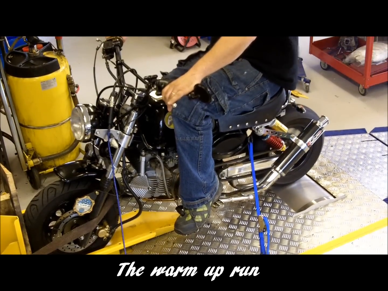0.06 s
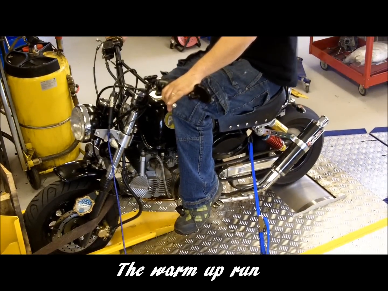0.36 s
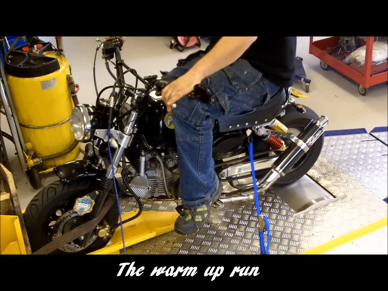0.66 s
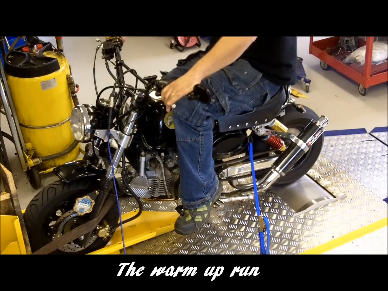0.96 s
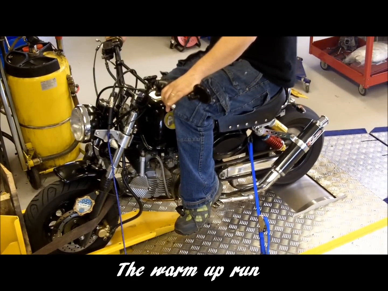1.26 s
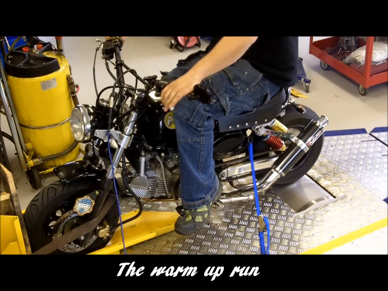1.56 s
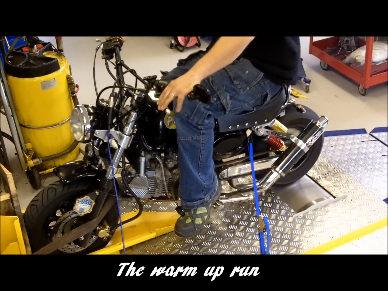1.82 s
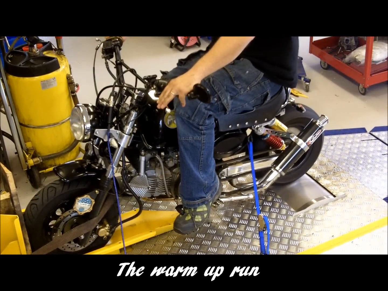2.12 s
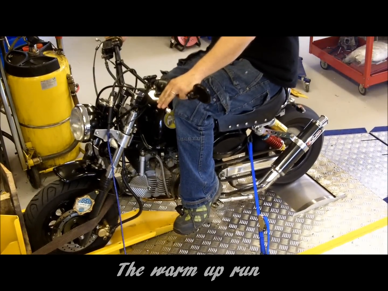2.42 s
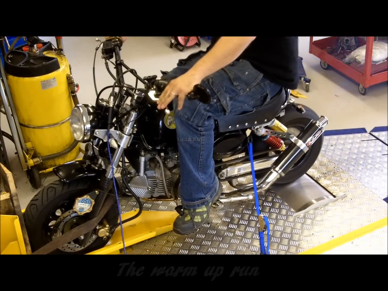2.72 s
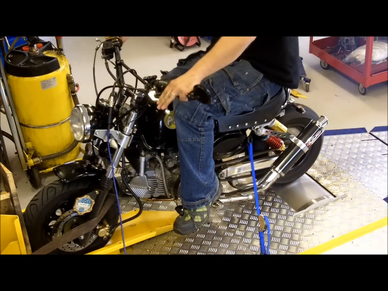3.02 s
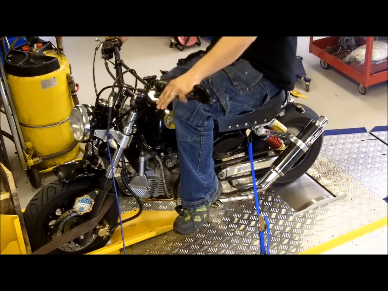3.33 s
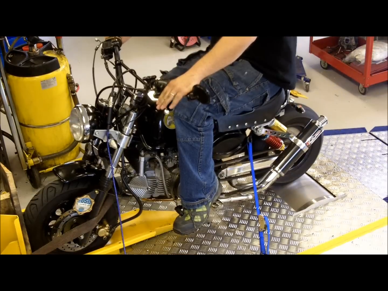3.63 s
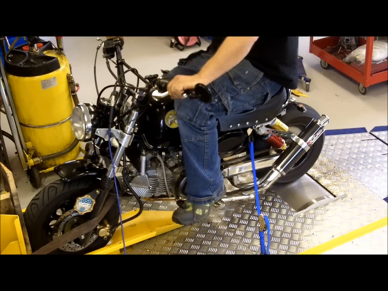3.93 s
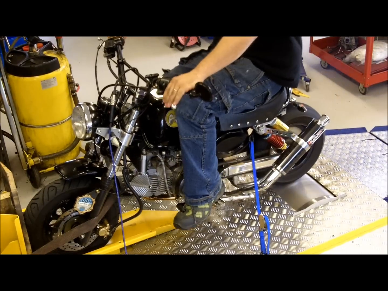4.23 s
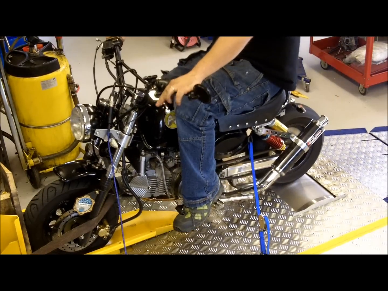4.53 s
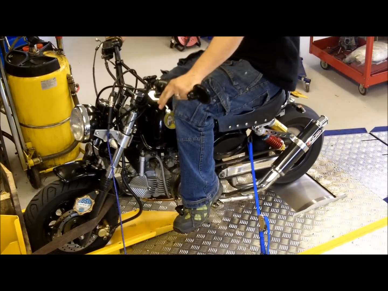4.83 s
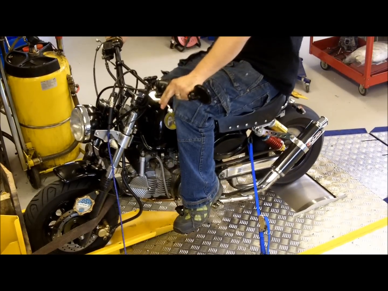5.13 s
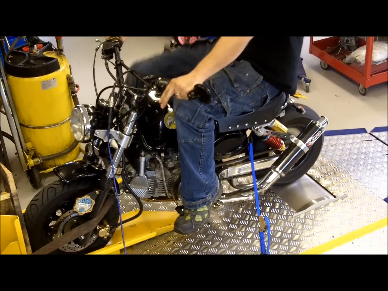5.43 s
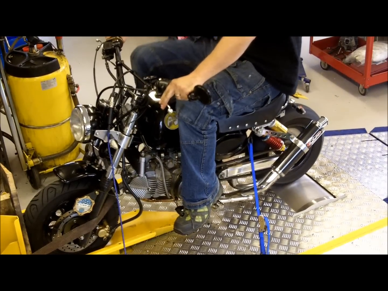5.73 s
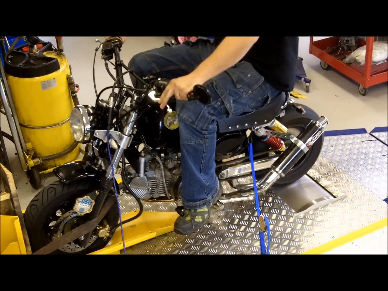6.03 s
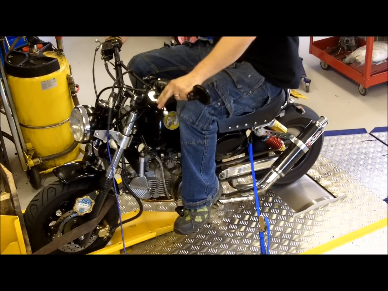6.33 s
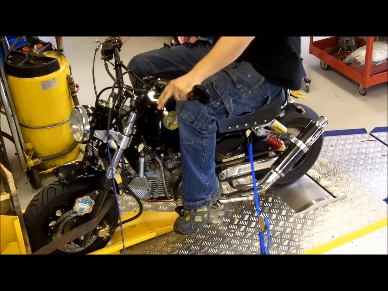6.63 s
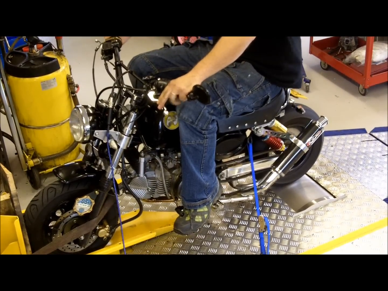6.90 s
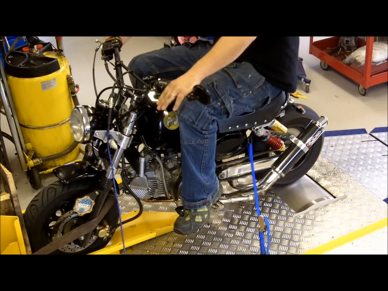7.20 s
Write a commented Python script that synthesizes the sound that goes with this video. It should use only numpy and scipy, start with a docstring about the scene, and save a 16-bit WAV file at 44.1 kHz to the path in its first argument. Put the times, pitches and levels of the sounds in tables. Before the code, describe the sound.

Close by in a slightly echoing workshop, a small motorcycle engine throbs at light throttle, then climbs in pitch with a hard, rasping exhaust. The throttle shuts briefly for a single gear change and the engine burbles down, before building speed again to the end. Metallic ticks and rattles from the engine and chain run through it, while the roller under the wheel rumbles faintly.

```python
"""In a workshop, a small single-cylinder four-stroke motorcycle pulls on a rolling road.
It runs steadily, accelerates, drops its revs for a gear change and pulls again.
Each firing sends a pulse out of the exhaust, whose harmonics sweep through the fixed resonances
of pipe and room. Escaping gas rasps, impacts of valve gear and chain ring
the engine cases, and the roller rumbles underneath."""
import sys
import numpy as np
from scipy import signal
from scipy.fft import irfft
from scipy.io import wavfile
from scipy.ndimage import uniform_filter1d

SR = 44100
rng = np.random.default_rng(int(sys.argv[2]) if len(sys.argv) > 2 else 0)


def digitize_waveform(pressure):
    """Quantize a signal to 16-bit integers and store it at the path in sys.argv[1].

    Rows of a 2-D input are taken as channels; values are limited to [-1, 1].
    """
    field = np.atleast_2d(pressure).T
    bounded = np.clip(field, -1, 1)
    quanta = np.round(bounded * 32767).astype(np.int16)
    wavfile.write(sys.argv[1], SR, quanta)


N = 320166
TIME = np.arange(N) / SR
FFT_SIZE = 32768
HZ = np.fft.rfftfreq(FFT_SIZE, 1 / SR)


def gain_of(db):
    """Amplitude ratio of a level in decibels."""
    return 10 ** (np.asarray(db) / 20)


def unit_rms(x):
    """Normalisation to an overall rms of 1."""
    return x / np.sqrt(np.mean(x ** 2) + 1e-20)


def steadied(x, size=6000):
    """Normalisation by the running rms over size samples."""
    return x / np.sqrt(abs(uniform_filter1d(x ** 2, size)) + 1e-12)


def spectrum_at(points, hz):
    """Interpolation of a table on a logarithmic frequency axis."""
    frequencies, values = np.transpose(points)
    return np.interp(np.log(hz + 1), np.log(frequencies + 1), values)


def resonances(modes):
    """Steep-sided resonances add in power."""
    return sum(gain_of(db) ** 2 / (1 + (2 * (HZ - hz) / width) ** 2) ** 2 for hz, width, db in modes)


def colour(x, gain):
    """Minimum-phase filtering: every resonance rings after its excitation."""
    log_gain = np.log(np.maximum(gain, 1e-5))
    mirrored = np.r_[log_gain, log_gain[-2:0:-1]]
    response = irfft(np.exp(np.conj(signal.hilbert(mirrored)))[:len(HZ)])
    return signal.oaconvolve(x, response[:FFT_SIZE // 2])[:N]


def per_cycle(turns):
    """Cycle-to-cycle variation: one Gaussian value held for each engine cycle."""
    return rng.standard_normal(N)[np.floor(turns).astype(int) + 2]


def spell(start_s, end_s, ramp_samples):
    """A trapezoidal gate, 1 between two times."""
    return uniform_filter1d(1. * ((TIME > start_s) & (TIME < end_s)), ramp_samples)


def overrun():
    """A gate that is 1 while the throttle closes for the gear change."""
    return spell(3.935, 4.34, ramp_samples=1000)


# Decay of the room. Each row: frequency in Hz, reverberation time in seconds.
ROOM_DECAY = [(100, 0.32), (1000, 0.74), (4000, 0.18), (12000, 0.02)]

def workshop(x, wet_db, count=1200, spacing=20):
    """Reverberation: sparse reflections of random sign, of which absorption takes the treble first."""
    taps = np.zeros(count * spacing)
    taps[np.arange(count) * spacing + rng.integers(0, spacing, count)] = rng.choice([-1., 1.], count)
    taps[:130] = 0  # 3 ms before the first reflection
    hz, age_s, bands = signal.stft(taps, SR, nperseg=256)
    decay = gain_of(-60 * age_s / spectrum_at(ROOM_DECAY, hz)[:, None])
    tail = signal.istft(bands * decay, SR, nperseg=256)[1]
    return x + gain_of(wet_db) * signal.oaconvolve(x, tail / np.linalg.norm(tail))[:N]


# Spectrum of tyre, roller and drive. Each row: frequency in Hz, relative level in dB.
RUMBLE_SPECTRUM = [(15, -23), (50, -30), (100, -23.5), (180, -28), (300, -14), (480, -15), (650, -23),
                   (1200, -38.5), (3000, -71)]

def roller(start_db=-51, end_db=-44, overrun_db=6):
    """Rolling noise grows as the roller gathers speed; the slack drive shudders at the gear change."""
    rumble = unit_rms(colour(rng.standard_normal(N), gain_of(spectrum_at(RUMBLE_SPECTRUM, HZ))))
    return rumble * gain_of(np.linspace(start_db, end_db, N) + overrun_db * overrun())


# Modes of cases and fins. Each row: frequency in Hz, width in Hz, dB above the impacts at coupling 1.
CASE_MODES = [(2270, 120, 4), (2760, 90, 2), (3860, 110, 9), (4650, 15, 6), (5570, 110, 8),
              (6060, 55, 14.5), (6350, 70, 3), (7597, 30, 9), (7850, 40, 4), (8940, 80, 4), (10390, 110, 4)]

def engine_cases(impacts, spectrum, coupling):
    """Modal ringing: the cases add narrow peaks to the broad spectrum of the impacts."""
    peaks = np.sqrt(1 + coupling * resonances(CASE_MODES))
    return colour(impacts, gain_of(spectrum_at(spectrum, HZ)) * peaks)


# Spectrum of chain and gears. Each row: frequency in Hz, relative level in dB.
RATTLE_SPECTRUM = [(200, -21.5), (600, -3), (1000, -7), (1400, -6.5), (1900, -3.5), (2600, -5.5),
                   (3400, -7.5), (4600, -9.5), (5600, 0.5), (6900, -2), (8000, -4.5), (9500, -10),
                   (11500, -18.5), (15000, -33.5)]

def chain_rattle(hits_per_s=2500, grain_db=-1.0):
    """Shot noise: dense random impacts of chain and gears merge into a rattle."""
    hits = (rng.random(N) < hits_per_s / SR) * rng.choice([-1., 1.], N)
    sizes = gain_of(grain_db * np.minimum(rng.exponential(1, N), 5))
    impacts = unit_rms(hits * sizes) + 0.59 * rng.standard_normal(N)
    return unit_rms(engine_cases(impacts, RATTLE_SPECTRUM, coupling=1))


# Spectrum of the valve gear. Each row: frequency in Hz, relative level in dB.
TICK_SPECTRUM = [(300, -17), (800, -8.5), (1400, 2), (1900, -4.5), (2400, -3), (3400, -8.5), (4600, -4),
                 (5600, 6.5), (8000, 1), (9500, -5), (11500, -22.5), (15000, -38)]

def valve_tick(turns, rate, lead_turns=.39, jitter_turns=0.0033, rise_s=0.00042, decay_s=0.0061):
    """Impact excitation: the valve gear strikes once a cycle and the vibration decays exponentially."""
    cam = turns + lead_turns + jitter_turns * per_cycle(turns + lead_turns + .5)
    age_s = (cam % 1) / rate
    blow = (1 - np.exp(-age_s / rise_s)) * np.exp(-age_s / decay_s) * gain_of(0.2 * per_cycle(cam))
    # the same parts meet in every cycle, so half of each tick repeats the last
    contact = rng.standard_normal(SR)[(age_s * SR).astype(int)] + rng.standard_normal(N)
    return steadied(engine_cases(blow * contact, TICK_SPECTRUM, coupling=0.53))


# The clatter eases or swells, longest as the clutch slips after the gear change.
# Each row: start in seconds, end in seconds, change of tick in dB, change of rattle in dB.
CLATTER_SWELLS = [(0.474, 0.574, -1.5, -1), (1.093, 1.27, -5.5, 1), (3.3, 3.93, 6, -1),
                  (4.313, 4.412, -6, 3.5), (4.675, 5.762, 6.5, 1)]

def clatter(turns, rate, throttle, rattle_db_per_hz=0.204):
    """Incoherent sources add in power: a tick that fades on the overrun, a rattle rising with speed."""
    tick_db = -43 - 18 * overrun()
    rattle_db = -48 + rattle_db_per_hz * (rate - rate[0]) + 4 * throttle
    for start_s, end_s, more_tick_db, more_rattle_db in CLATTER_SWELLS:
        during = spell(start_s, end_s, ramp_samples=4000)
        tick_db += more_tick_db * during
        rattle_db += more_rattle_db * during
    level = np.hypot(gain_of(tick_db), gain_of(rattle_db))
    tick_share = (gain_of(tick_db) / level) ** 2
    metal = np.sqrt(tick_share) * valve_tick(turns, rate) + np.sqrt(1 - tick_share) * chain_rattle()
    return level * steadied(workshop(metal, wet_db=-7.5))


# Echoes inside the silencer. Each row: round trip in seconds, reflection coefficient.
BAFFLE_ECHOES = [(.00047, .5), (.00083, .5), (.00139, .25)]

def baffles(x):
    """All-pass dispersion: echoes spread each crack into a short burst without colouring it."""
    for trip_s, reflection in BAFFLE_ECHOES:
        loop = np.r_[1, np.zeros(round(trip_s * SR)), reflection]
        x = signal.lfilter(loop[::-1], loop, x)
    return x


# Spectrum of the escaping gas. Each row: frequency in Hz, relative level in dB.
GAS_SPECTRUM = [(300, -48.5), (600, -1), (900, -10.5), (1130, -1.5), (1400, -0.5), (1800, -1), (2250, -4),
                (3000, -15), (3900, -12.5), (6000, -33), (12000, -34)]
# Fixed resonances of room and exhaust that ring in the rasp.
# Each row: frequency in Hz, width in Hz, level in dB above the gas spectrum.
RASP_RESONANCES = [(1003, 50, 9), (1330, 110, -1), (1430, 130, 4.5), (1520, 100, 0), (1620, 120, 1),
                   (2200, 200, -3)]

def rasp(turns, rate, throttle, crack_s=6e-5, puff_s=0.001, jitter_s=1e-5, db_per_doubling=11.5):
    """Blowdown: the valve opens with a crack and a turbulent puff; under load the crack dominates."""
    from_crack_s = ((turns + .5) % 1 - .5) / rate + jitter_s * per_cycle(turns + .5)
    crack = np.exp(-(from_crack_s / crack_s) ** 2)
    puff = (1.4 + np.exp(-(turns % 1) / rate / puff_s)) * rng.standard_normal(N)
    response = gain_of(spectrum_at(GAS_SPECTRUM, HZ)) * np.sqrt(1 + resonances(RASP_RESONANCES))
    size = gain_of(-0.5 * per_cycle(turns + .5))
    bark = steadied(colour(baffles(size * crack), response))
    hiss = steadied(colour(size * puff, response))
    hiss_share = np.clip(np.interp(throttle, [.18, .55], [0.63, .06]) + overrun() / 2, 0, 1)
    gas = np.sqrt(1 - hiss_share) * bark + np.sqrt(hiss_share) * hiss
    level_db = -28 + db_per_doubling * np.log2(throttle)  # grows with the flow through the throttle
    return gain_of(level_db) * steadied(workshop(gas, wet_db=-10))


# The pulse at the valve. Each row: harmonic number, relative level in dB before the effect of load.
PULSE_HARMONICS = [(1, 0.8), (2, 1.86), (3, -3), (4, 1.9), (5, 3.5), (6, 1.6), (7, 1.3), (8, 2), (9, 3)]

def firing_pulses(turns, rate, throttle, pivot_hz=200, sharp_octaves=1.45, knee_hz=530):
    """A Fourier series at the firing rate: pulses are stronger and sharper under load."""
    shut = overrun()  # here the engine fires unevenly and the pulse loses its thump
    uneven_db = 0.57 + 1.4 * shut
    jitter_turns = 0.0011 + 0.003 * shut
    sharp_db = -18.5 + 20.5 * throttle  # above the pivot
    thump_db = -7 - 1.5 * throttle - 6.5 * shut  # below the pivot
    strength = gain_of(-29 + 7.5 * throttle + uneven_db * per_cycle(turns + .5))
    angle = 2 * np.pi * (turns + jitter_turns * uniform_filter1d(per_cycle(turns + .5), 200))
    pulses = np.zeros(N)
    for k in np.arange(1, 33):
        octaves = np.log2(k * rate / pivot_hz)
        load_db = sharp_db * np.clip(octaves / sharp_octaves, 0, 1) + thump_db * np.clip(-octaves, 0, 1)
        # a light throttle lets out a rounder pulse, weaker above the knee
        load_db += 0.76 * np.minimum(sharp_db, 0) * np.clip(k * rate / knee_hz - 1, 0, .2)
        # the pipe draws out the body of the pulse; its sharp edge stays compact
        lag_rad = 0.1593 * (min(k, 14) - 6.57) ** 2
        shape_db = spectrum_at(PULSE_HARMONICS, k) * (1 - shut)
        pulses -= gain_of(shape_db + load_db) * np.cos(k * angle - lag_rad)
    return uniform_filter1d(strength, 200) * pulses


# Modes of pipe and workshop. Each row: frequency in Hz, width in Hz, peak gain in dB.
PIPE_ROOM_MODES = [(40, 6.1, -10), (49.7, 14, -10), (73, 8.9, -1.5), (83.1, 12, -3.5), (96.5, 9.3, -8),
                   (111.5, 4.6, -8.5), (126.9, 5.9, -4.5), (151.2, 9.5, 1), (173.3, 31, -0.6),
                   (204.1, 6.3, -3.5), (215.8, 36, -3.5), (237.7, 7.4, -5), (287.9, 11.3, -6.5),
                   (316.5, 23, -10), (337, 43, -11), (374.7, 6, -8.5), (393.8, 18.4, -5), (427, 8.1, -13),
                   (474.9, 31, -4.5), (510.1, 19, -9), (540.5, 17.7, -9), (592, 5.3, -20.5), (643, 35, -12),
                   (667.3, 15, -12), (718.6, 20, -14), (759.6, 28, -12), (805.4, 40, -19), (845, 27, -16.5),
                   (932, 61.3, -22.5), (991, 35.5, -18)]
# Broad boom of the pipe on the overrun. Each row: frequency in Hz, width in Hz, peak gain in dB.
BURBLE_MODES = [(183, 120, 1.5), (438, 183, -7.5)]

def exhaust(turns, rate, throttle):
    """Forced resonance: each harmonic of the pulses swells as it crosses a mode of pipe or room."""
    pulses = firing_pulses(turns, rate, throttle)
    shut = overrun()
    drone = colour(pulses * (1 - shut), np.sqrt(resonances(PIPE_ROOM_MODES)))
    burble = colour(pulses * shut, np.sqrt(resonances(BURBLE_MODES)))
    return drone + burble


# Engine speed. Each row: time in seconds, firing rate in Hz.
FIRING_RATE = [(0.0, 33.59), (0.38, 33.95), (0.75, 35.84), (1.03, 35.58), (1.25, 39.3), (2.15, 51.77),
               (2.5, 57.74), (3.1, 72.44), (3.72, 87.7), (3.92, 89.5), (3.98, 79.44), (4.3, 48.68),
               (4.37, 56.65), (4.47, 53.79), (5.35, 64.94), (6.2, 74.63), (6.98, 82.54), (7.26, 84.54)]
# Engine load. Each row: time in seconds, throttle opening from 0 to 1.
THROTTLE_OPENING = [(0, .08), (1.1, 0.17), (1.25, 0.26), (2.35, 0.34), (3.1, 0.64), (3.55, 0.77), (3.91, 1),
                    (4.01, 0.35), (4.27, 0.1), (4.35, 0.44), (4.48, 0.41), (5.25, 0.74), (5.7, 0.67),
                    (6.3, 0.81), (6.85, 0.82), (7.26, 0.99)]

def scene():
    """Superposition: the engine's sounds share one crankshaft and throttle, over the roller's rumble."""
    rate = np.interp(TIME, *np.transpose(FIRING_RATE))
    throttle = np.interp(TIME, *np.transpose(THROTTLE_OPENING))
    turns = np.cumsum(rate) / SR - .33  # camshaft turns, one for each firing
    engine = turns, rate, throttle
    bike = exhaust(*engine) + rasp(*engine) + clatter(*engine) + roller()
    return np.array([bike, bike])


def record(dry, notch_hz=4225, notch_width_hz=330, cutoff_hz=15150):
    """Linear filtering: a narrow notch in the treble and a steep band limit."""
    notch = abs(HZ - notch_hz) / np.hypot(HZ - notch_hz, notch_width_hz)
    notched = np.array([colour(channel, notch) for channel in dry])
    lowpass = signal.firwin(511, cutoff_hz, window=("kaiser", 9), fs=SR)
    return signal.oaconvolve(notched, lowpass[None], "same")


dry = scene()
out = record(dry)
digitize_waveform(out)
```